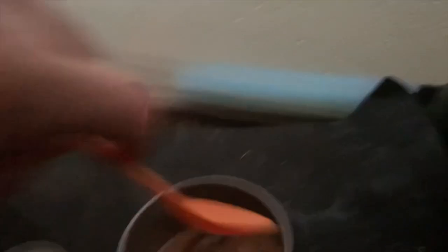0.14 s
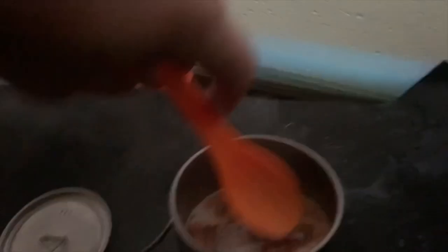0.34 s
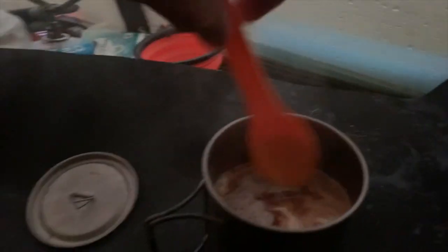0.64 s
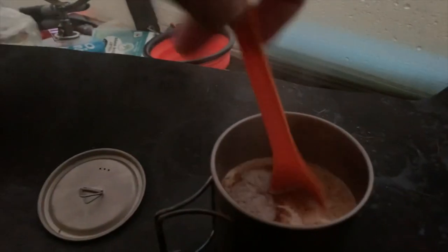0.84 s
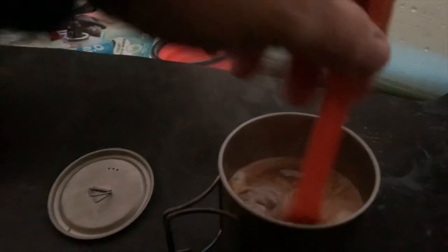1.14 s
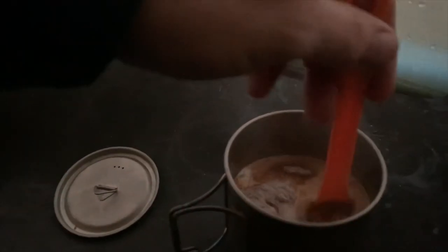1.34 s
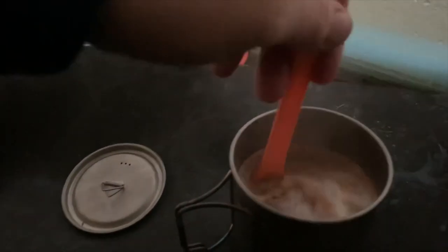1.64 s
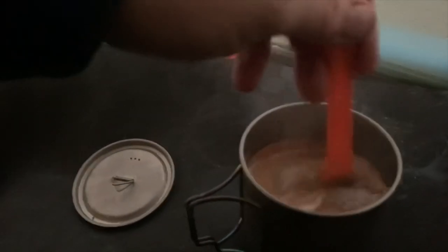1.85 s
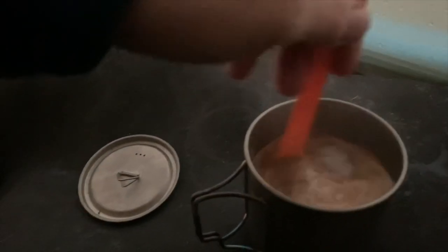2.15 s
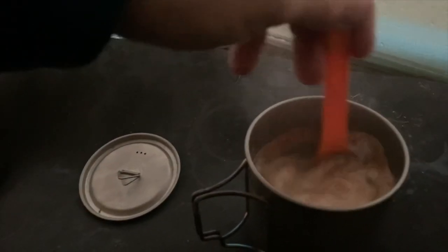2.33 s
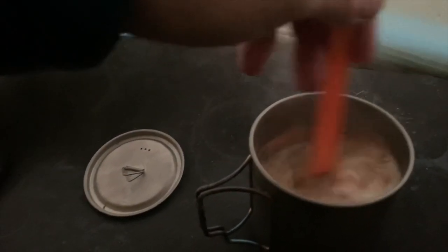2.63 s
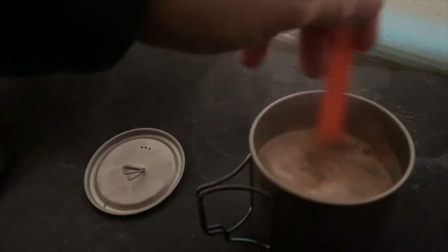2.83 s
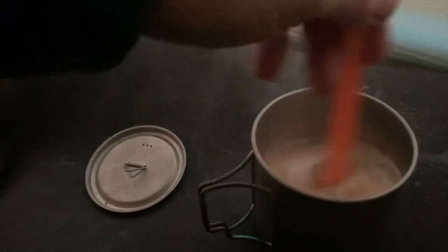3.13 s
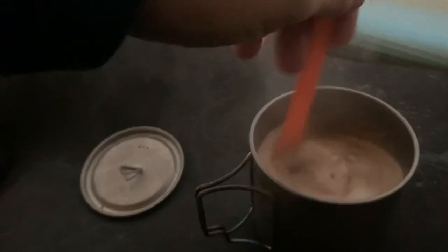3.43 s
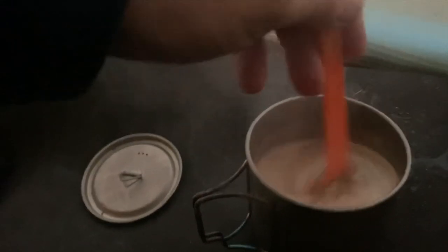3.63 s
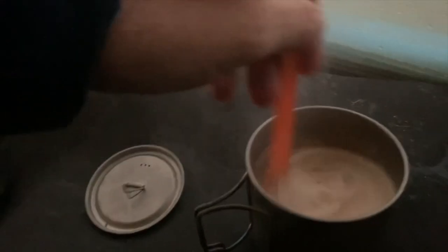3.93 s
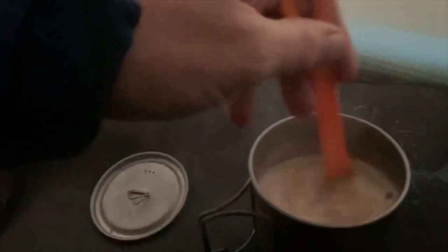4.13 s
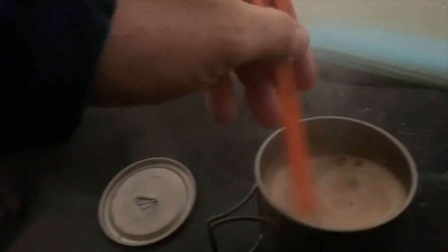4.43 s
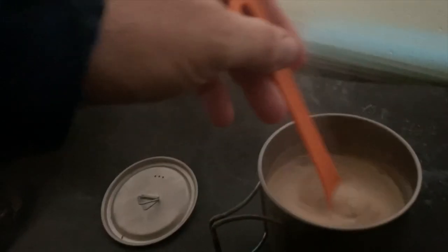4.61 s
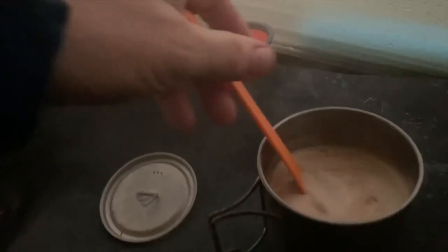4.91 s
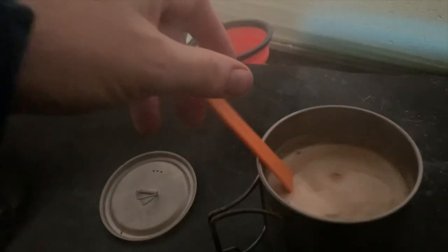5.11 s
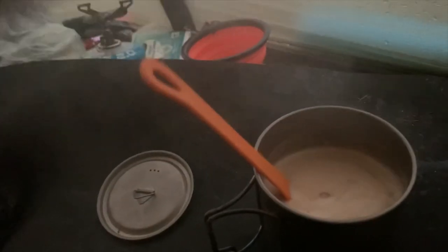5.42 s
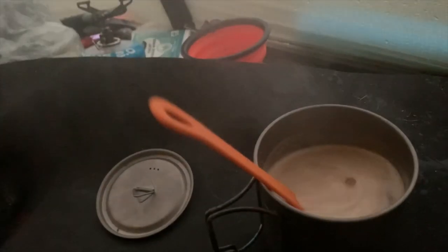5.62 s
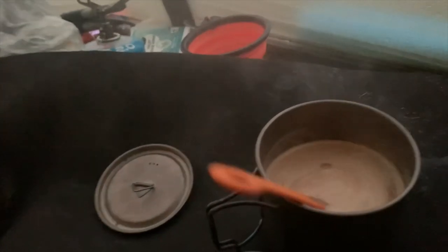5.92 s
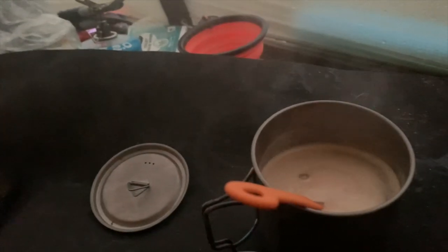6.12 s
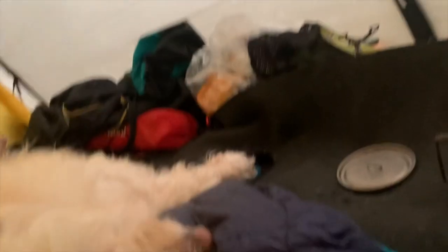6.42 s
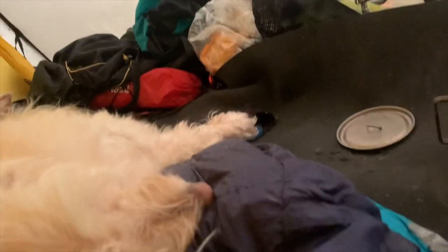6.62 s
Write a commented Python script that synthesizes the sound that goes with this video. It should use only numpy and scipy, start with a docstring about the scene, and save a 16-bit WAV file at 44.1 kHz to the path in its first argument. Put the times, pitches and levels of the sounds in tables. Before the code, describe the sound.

Heavy rain falls on a tent for the whole seven seconds or so, heard from inside. It is a dense patter with a fine hiss above it, single fat drops snapping on the taut fabric overhead, and a soft low drumming with occasional dull thumps beneath. Close to the microphone, a plastic spoon stirs a drink in a small metal pot. A few sharp ticks and a tiny scrape come at about 0.5 seconds, followed by scattered ticks and small liquid plops. The stirring is busiest from about 2.8 to 4.3 seconds, with quick ticks, short damped taps on the pot wall, very brief scrapes and more plops. The last faint ticks come by 5.4 seconds. Around 5.8 seconds the patter grows heavier. At about 6.3 seconds the listening position jumps within the tent, and the rain is louder and fuller, with a cluster of strong drops until the end.

```python
"""Heavy rain on a tent, heard from inside on a microphone pair, over a small pot with a drink in it.
Drops snap on the taut fabric overhead, fine spray fizzes above them and the panels drum softly below.
A plastic spoon stirs: it ticks, taps and scrapes on the pot wall, and the drink plops.
Near the end the microphones jump to the bedding, where the rain on the fabric is louder and fuller."""
import sys
import numpy as np
from scipy import signal
from scipy.fft import rfft, irfft, next_fast_len
from scipy.io import wavfile
from scipy.ndimage import uniform_filter1d

SR = 44100
rng = np.random.default_rng(int(sys.argv[2]) if len(sys.argv) > 2 else 0)


def wav_out(sig):
    """Save sig, one row per channel (or a flat mono array), as 16-bit PCM at SR to the path in sys.argv[1]."""
    wavfile.write(sys.argv[1], SR, np.round(np.clip(np.atleast_2d(sig).T, -1, 1) * 32767).astype(np.int16))


N = 298116
TIME = np.arange(N) / SR


def rainfall(flurry_db=1.0, flurry_s=.04, spray_swing=1.87):
    """Middling drops pat on the roof, tiny ones tick above. Gives steady pats, flurried patter and spray."""
    pats = shower(per_s=520, spread_db=3.15, largest=2.27, span_hz=(640, 4290),
                  burst_s=.002, ring_db=-6, q=13.3)
    specks = shower(per_s=900, spread_db=3.5, largest=3.1, span_hz=(2587, 12570),
                    burst_s=.0022, ring_db=-1, q=22)
    knots = np.arange(0, N / SR + 1, flurry_s)
    flurry = gain_of(flurry_db * np.interp(TIME, knots, rng.standard_normal(1000)[:len(knots)]))
    patter = flurry * far_wash(pats, db=-9)
    spray = flurry ** spray_swing * far_wash(unit_rms(specks + pats), db=-7)
    return pats, patter, spray


def shower(per_s, spread_db, largest, span_hz, burst_s, ring_db, q, count=160):
    """Drops of random size land at random times on spots of differing tautness, each with its own pitch."""
    lands = rng.random(N) < per_s / SR
    strength = gain_of(spread_db * np.minimum(rng.exponential(1, N), largest))
    spot_hit = rng.integers(0, count, N)
    spots = [impact(hz, ring_db, q, burst_s * 2 ** rng.uniform(-1, 1), tail_db=-11)
             for hz in np.geomspace(*span_hz, count)]
    out = np.zeros((2, N))
    for i in np.flatnonzero(lands):
        add(out, i / SR, strength[i] * spots[spot_hit[i]])
    return unit_rms(out)


def impact(hz, ring_db, q, burst_s, tail_db=-13, tail_s=.008, size=2200):
    """One hit of unit energy: a crack, a short burst and its scatter, ringing at the pitch of the spot."""
    t = np.arange(size) / SR
    crack = np.exp(-t / .0006)
    scatter = gain_of(tail_db) * np.exp(-t / tail_s)
    burst = rng.standard_normal((2, size)) * (crack + np.exp(-t / burst_s) + scatter)
    ring = signal.lfilter(*signal.iirpeak(hz, q, SR), burst)
    return unit_rms(unit_rms(burst) + gain_of(ring_db) * unit_rms(ring)) / np.sqrt(2 * size)


# Strength of the rain above the pot: (time [s], relative patter level [dB], relative spray level [dB])
RAIN_OVER_POT = [(0.0, -39.5, -42.5), (0.1, -39.5, -42), (0.2, -46, -47), (0.4, -43.5, -42.5),
                 (0.64, -45.5, -44.5), (1.0, -41.5, -42.5), (1.4, -40.5, -39.5), (1.47, -49, -45.5),
                 (1.6, -39.5, -37.5), (1.9, -42.5, -44), (2.5, -42.5, -42.5), (2.97, -43.5, -45.5),
                 (3.5, -44, -44), (3.75, -44, -47), (4.05, -40.5, -42), (4.74, -41, -41.5),
                 (4.87, -47, -47.5), (5.06, -38.5, -39.5), (5.58, -42.5, -43), (5.84, -33.5, -39),
                 (6.02, -36.5, -43.5), (6.14, -33, -41.5), (6.3, -40.5, -46.5)]
# The fabric heard from the pot, and the spray from either place: (frequency [Hz], relative level [dB])
FABRIC_FROM_POT = [(100, -14), (250, 5), (400, -4), (550, -9), (830, 2.5), (1050, 0), (1400, 3.5),
                   (2200, 3.5), (4000, -0.5), (6000, -18), (10000, -26.5), (16000, -7.5)]
SPRAY_COLOUR = [(500, 5.5), (2000, -5.5), (3700, -0.5), (5300, 0.5), (7000, 1), (9000, -3), (11000, -1),
                (13000, -5.5), (16000, -6.5)]
def rain_over_pot(patter, spray):
    """Rain on the roof with the microphones at the pot; the patter grows heavier near the end."""
    fabric = colour(patter * follow(RAIN_OVER_POT, column=1), FABRIC_FROM_POT)
    fizz = colour(spray * follow(RAIN_OVER_POT, column=2), SPRAY_COLOUR)
    return gain_of(-4) * fabric + gain_of(1.55) * fizz


# The fabric heard from the bedding: (frequency [Hz], relative level [dB])
FABRIC_FROM_BED = [(100, 5), (250, 0.5), (550, 1), (850, -4), (1400, -5), (2200, -1), (4000, -10),
                   (6500, -14), (10000, -27), (16000, -27)]
def rain_over_bed(pats, spray):
    """Rain on the roof with the microphones at the bedding: steady, with more far drops in it."""
    fabric = colour(far_wash(pats, db=-2.5), FABRIC_FROM_BED)
    return gain_of(-34) * fabric + gain_of(-38) * colour(spray, SPRAY_COLOUR)


# Single loud drops overhead: (time [s], relative level [dB], snap offset [dB], pitch [Hz])
FAT_DROPS = [(0.044, -25, -4, 1510), (0.068, -32, 2.5, 1110), (0.116, -28, -4, 2300),
             (0.532, -29.5, -11, 1260), (0.79, -30, 4, 1640), (0.8715, -35.5, 4, 920),
             (0.927, -27, -2, 2200), (1.151, -32, 6, 1500), (1.695, -26.5, -15, 1160),
             (1.709, -28, 5, 1400), (1.7981, -25.5, -3, 1130), (2.1644, -27.5, 1, 840),
             (2.384, -32, 6, 855), (2.585, -31.5, 2, 2000), (2.7654, -32, 7, 890), (2.8926, -29.5, -8, 860),
             (3.042, -34, 1, 1540), (3.076, -33, -9, 800), (3.174, -33, -13, 900), (3.192, -31.5, -12, 970),
             (3.322, -27, -4, 1410), (4.039, -28.5, 0, 825), (4.13, -26.5, 2, 1250), (4.2279, -32, 6, 1200),
             (4.277, -32, -14, 1240), (4.5415, -31, -8, 820), (4.623, -25.5, -1, 1710),
             (4.8402, -25.5, -9, 1330), (5.3725, -26, -3, 1240), (5.474, -27, -8, 1700),
             (5.7915, -31, -12, 2840), (5.8333, -28, 1.5, 1210), (5.856, -23.5, -8, 2200),
             (5.936, -24, -2.5, 2450), (6.1038, -31, -15, 1500), (6.1721, -27, -14, 2220),
             (6.337, -31, -1.5, 790), (6.3621, -20.5, -9, 990), (6.434, -28, -12, 1060),
             (6.451, -21.5, -6, 920), (6.488, -24, -24, 1350), (6.518, -30, -18, 1810),
             (6.5942, -17.5, -7.5, 1270), (6.621, -24, -14, 750), (6.6573, -18.5, -15, 1190),
             (6.6724, -24, -4.5, 1500), (6.697, -29, -14, 1590), (6.724, -26.5, -6, 1030)]
# Their slap on the fabric: (frequency [Hz], relative level [dB])
SLAP_COLOUR = [(100, -27), (350, 4), (800, 3), (1400, 0.5), (2200, -2), (4000, 0), (8000, -35),
               (16000, -30)]
def fat_drops(slap_db, dent_db, snap_db, thud_db, echo_s=.003, echo_db=-11):
    """Each fat drop dents the fabric, slaps, and adds a bright snap of water and a brief low thud."""
    slaps, snaps, dents = np.zeros((3, 2, N))
    t = np.arange(SR // 20) / SR
    for s, db, snap_offset_db, hz in FAT_DROPS:
        slap = impact(hz, ring_db=-6, q=3, burst_s=.0018)
        snap = impact(rng.uniform(4000, 11000), ring_db=-7, q=4, burst_s=.0022)
        thud_hz = 390 * 2 ** rng.uniform(-.3, .3)
        thud = np.sin(2 * np.pi * thud_hz * t) * np.exp(-t / .005)
        add(slaps, s + .001, gain_of(db + slap_db) * slap)  # just after the fabric first gives
        add(snaps, s, gain_of(db + snap_offset_db + snap_db) * snap)
        add(dents, s, gain_of(db + dent_db) * dent(hz))
        add(dents, s + echo_s, gain_of(db + dent_db + echo_db) * dent(hz))  # off the nearest tent wall
        add(dents, s, gain_of(db + thud_db) * thud)
    return colour(slaps, SLAP_COLOUR) + dents + colour(snaps, SPRAY_COLOUR)


def dent(hz, rise_cycles=.48, glide=.98):
    """The fabric dents and springs back in a short falling chirp, since its fast ripples arrive first."""
    t = np.arange(SR // 50) / SR
    age = t * hz / rise_cycles
    pitch = hz * (1 + glide * np.exp(-age)) * np.exp(-age / 10)
    return age * np.exp(1 - age) * np.sin(2 * np.pi * np.cumsum(pitch) / SR)


# Sharp ticks, mostly the spoon on the pot: (time [s], relative level [dB], pitch [Hz])
SPOON_TICKS = [(0.412, -32.5, 6480), (0.477, -29.5, 7100), (0.521, -33, 6000), (0.5324, -25.5, 6300),
               (0.859, -35, 11000), (1.1022, -29.5, 10400), (1.51, -33, 7200), (2.038, -30, 7600),
               (2.807, -27.5, 10200), (2.8945, -23.5, 7000), (3.042, -28.5, 8140), (3.0756, -25.5, 7500),
               (3.164, -29, 6000), (3.1732, -30.5, 5600), (3.19, -33, 6840), (3.2158, -26, 10500),
               (3.897, -32, 5400), (3.9535, -30, 6500), (4.503, -29, 7040), (5.113, -31, 11500),
               (5.37, -34, 11000)]
# Their colour at the pot: (frequency [Hz], relative level [dB])
TICK_COLOUR = [(200, -33), (800, 7.5), (2500, 6.5), (5000, 0), (11000, -0.5), (16000, -4)]
def spoon_ticks(gain_db=23):
    """Hard, bright contacts that die at once."""
    out = np.zeros((2, N))
    for s, db, hz in SPOON_TICKS:
        contact = impact(hz, ring_db=-7, q=6, burst_s=.0028, tail_db=-14, tail_s=.009)
        add(out, s, gain_of(db + gain_db) * contact)
    return colour(out, TICK_COLOUR)


# Taps on the pot wall: (time [s], relative level [dB], pitch the spot favours [Hz], spread [octaves])
SPOON_TAPS = [(0.0325, -26.5, 1750, 0.22), (2.7653, -24, 2630, 0.34), (2.8936, -25, 1810, 0.34),
              (2.8945, -25, 780, 0.4), (3.077, -32, 900, 1.2), (3.164, -33, 1600, 0.48),
              (3.3211, -29, 1400, 0.95), (3.4895, -28, 1950, 0.29), (3.668, -25.5, 1270, 0.3),
              (4.2769, -26, 1400, 0.37)]
# Modes of the filled pot: (frequency [Hz], relative level [dB], time to fall 60 dB [s])
FILLED_POT_MODES = [(795, -5, 0.044), (1150, -2, 0.018), (1360, -2, 0.025), (1890, -1, 0.024),
                    (2360, -2, 0.028), (3180, -4, 0.035)]
def spoon_taps():
    """The spoon taps the filled pot; where it strikes decides which of the damped modes speak."""
    out, t = np.zeros((2, N)), np.arange(SR // 8) / SR
    hz, mode_db, t60 = np.transpose(FILLED_POT_MODES)[:, :, None]
    for s, db, spot_hz, octaves in SPOON_TAPS:
        share = np.exp(-(np.log2(hz / spot_hz) / octaves) ** 2)
        modes = share * gain_of(mode_db - 60 * t / t60) * np.sin(2 * np.pi * hz * t)
        add(out, s, gain_of(db) * modes.sum(0))
    return out


# Short scrapes along the pot wall: (time [s], length [s], level [dB])
SPOON_SCRAPES = [(0.478, 0.018, -37.5), (3.156, 0.028, -35), (3.49, 0.012, -34)]
# Their colour at the pot: (frequency [Hz], relative level [dB])
SCRAPE_COLOUR = [(300, -25), (900, 4), (1800, 1), (3000, -5), (6000, -4), (11000, -5), (16000, -28)]
def spoon_scrapes(slips_per_s=700, grit_db=-9):
    """The spoon drags in a quick run of tiny slips, with grit between them."""
    out = np.zeros((2, N))
    for s, length, db in SPOON_SCRAPES:
        size = round(length * SR)
        slips = (rng.random(size) < slips_per_s / SR) * rng.choice([-1., 1.], (2, size))
        grit = gain_of(grit_db) * rng.standard_normal((2, size))
        drag = unit_rms(unit_rms(slips) + grit)
        add(out, s, gain_of(db) * signal.get_window(("tukey", .5), size) * drag)
    return colour(out, SCRAPE_COLOUR)


# Plops, centred between the microphones: (time [s], level [dB], pitch [Hz], time to fall 60 dB [s])
LIQUID_PLOPS = [(0.0445, -26, 870, 0.014), (0.0705, -29, 744, 0.023), (1.3274, -20, 1210, 0.01),
                (1.3323, -25, 1090, 0.017), (1.622, -31, 404, 0.098), (2.0, -31.5, 353, 0.068),
                (3.194, -30, 570, 0.018), (3.205, -27.5, 322, 0.042), (3.321, -25, 540, 0.035),
                (3.671, -23.5, 380, 0.062), (4.116, -29, 380, 0.03), (4.277, -14.5, 533, 0.008)]
def plops():
    """Drips and the stirred drink ring briefly, falling in pitch."""
    return sagging_rings(LIQUID_PLOPS, sag=.21)


# Thumps, centred between the microphones: (time [s], level [dB], pitch [Hz], time to fall 60 dB [s])
LOW_THUMPS = [(0.49, -30, 122, 0.11), (1.25, -19, 106, 0.13), (1.615, -20, 73.5, 0.12),
              (1.79, -23, 95, 0.08), (2.335, -24, 87, 0.075), (3.32, -22.5, 124, 0.08),
              (3.58, -20.5, 93, 0.17), (4.277, -18, 127, 0.053), (4.94, -28, 78, 0.09),
              (5.835, -16, 73, 0.055), (6.172, -17.5, 76, 0.091)]
def thumps():
    """Dull, low notes under the rain, nearly steady in pitch."""
    return sagging_rings(LOW_THUMPS, sag=.032)


# Drumming of the tent all around: (time [s], relative wide-panel level [dB], small-panel level [dB])
PANEL_LEVELS = [(0.0, -50, -57), (0.48, -36, -38), (0.76, -42, -46.5), (1.32, -36, -40.5),
                (1.76, -33, -38.5), (1.92, -38.5, -42.5), (2.56, -40, -40), (3.04, -35, -39),
                (3.16, -41.5, -46.5), (3.32, -38, -40.5), (4.08, -44.5, -49), (4.28, -40.5, -43.0),
                (4.88, -34.5, -43), (5.04, -41, -38), (5.4, -35.5, -42.5), (5.52, -41.5, -44.5),
                (6.28, -34.5, -38), (6.76, -38, -53)]
# How the wide and the small panels answer a push: (frequency [Hz], relative level [dB])
WIDE_PANEL_COLOUR = [(15, -6), (30, -32), (45, -0.5), (80, -0.5), (115, -4.5), (160, -12.5), (300, -33),
                     (1000, -75.5)]
SMALL_PANEL_COLOUR = [(50, -24), (110, -2), (150, 0.5), (200, -2.5), (270, -13), (450, -22.5), (1200, -65)]
def panel_drumming(spectrum, level, per_s, side_db):
    """Drops push whole panels; the pushes merge into long waves, nearly alike at both microphones."""
    pushes = (rng.random(N) < per_s / SR) * rng.standard_normal((2, N))
    mid, side = colour(pushes, spectrum)
    rumble = mid + gain_of(side_db) * np.array([side, -side])
    running_rms = np.sqrt(uniform_filter1d(mid ** 2, size=6000) + 1e-9)
    return level * rumble / running_rms


def far_wash(near, db):
    """Countless far drops blur into a smooth hiss under the near ones."""
    return unit_rms(near + gain_of(db) * rng.standard_normal((2, N)))


# The pair in each place: (frequency [Hz], likeness [0-1], left phase lead [rad], left over right [dB])
MICS_AT_POT = [(180, 0.99, -0.0, -0.2), (380, 0.57, -0.9, -2.3), (550, 0.22, -1.0, -7.1),
               (780, 0.75, -0.4, -4.3), (1020, 0.38, -1.7, -2.0), (1650, 0.35, 0.0, -0.7),
               (2400, 0.49, 1.6, -0.1), (3300, 0.59, 1.0, -0.0), (4100, 0.72, 2.2, 0.3),
               (4700, 0.96, 3.1, 0.2), (5500, 0.78, 4.5, 0.1), (6600, 0.94, 6.1, 0.1),
               (9000, 0.93, 9.4, 0.0), (11200, 0.9, 12.6, -0.0), (13300, 0.92, 15.7, 0.1),
               (15000, 0.8, 18.8, 0.0)]
MICS_AT_BED = [(100, 0.97, 0.3, 1.8), (350, 0.29, -1.3, 7.8), (800, 0.62, -1.4, -1.1),
               (1700, 0.6, 0.9, 0.7), (3000, 0.2, -0.2, 0.2), (5000, 0.23, -0.3, 1.2),
               (7000, 0.39, 0.5, 0.6), (9700, 0.71, 3.1, -0.0), (13000, 0.8, 6.3, -0.1),
               (15800, 0.54, 9.4, 0.1)]
def microphone_pair(x, placement):
    """The two microphones hear partly the same sound, shifted in phase and level."""
    size = next_fast_len(N + 2048)
    hz, *columns = np.transpose(placement)
    likeness, phase, balance_db = (np.interp(np.fft.rfftfreq(size, 1 / SR), hz, c) for c in columns)
    left, other = rfft(x, size)
    right = (likeness * left + np.sqrt(1 - likeness ** 2) * other) * np.exp(-1j * phase)
    lean = gain_of(balance_db / 2)
    return irfft(np.array([left * lean, right / lean]), size)[:, :N]


def sagging_rings(rows, sag, sag_s=.013):
    """One damped mode a row; it swells within a cycle, and its pitch sags by a share as it dies."""
    out, t = np.zeros((2, N)), np.arange(SR // 5) / SR
    for s, db, hz, t60 in rows:
        pitch = hz * (1 - sag * (1 - np.exp(-t / sag_s)))
        cycles = np.cumsum(pitch) / SR
        envelope = np.minimum(2 * cycles, 1) * gain_of(db - 60 * t / t60)
        add(out, s, envelope * np.sin(2 * np.pi * cycles))
    return out


def colour(x, spectrum, size=4096):
    """Causal filter of unit energy with the given spectrum."""
    hz, db = np.transpose(spectrum)
    log_hz = np.log(abs(np.fft.fftfreq(size, 1 / SR)) + 1)
    log_gain = np.log(gain_of(np.interp(log_hz, np.log(hz), db)))
    minimum_phase = np.exp(np.conj(signal.hilbert(log_gain)))
    taps = np.fft.ifft(minimum_phase).real[:size // 2]
    return signal.oaconvolve(x, taps[None] / np.linalg.norm(taps), axes=1)[:, :x.shape[1]]


def gain_of(db):
    """Decibels to amplitude."""
    return 10 ** (np.asarray(db) / 20)


def unit_rms(x):
    """Scales to an rms of 1."""
    return x / np.sqrt(np.mean(x ** 2) + 1e-20)


def follow(rows, column):
    """Gain at every sample from one dB column of a curve."""
    columns = np.transpose(rows)
    return gain_of(np.interp(TIME, columns[0], columns[column]))


def add(mix, s, sound):
    """Mixes a sound in at s seconds."""
    part = mix[:, max(round(s * SR), 0):][:, :sound.shape[-1]]
    part += sound[..., :part.shape[1]]


def scene(move_s=6.333):
    """Inside the tent: the microphones stand at the pot, then from move_s at the bedding."""
    pats, patter, spray = rainfall()
    at_pot = rain_over_pot(patter, spray)
    at_pot += fat_drops(slap_db=16.5, dent_db=-1.5, snap_db=18.5, thud_db=-16.5)
    at_bed = rain_over_bed(pats, spray)
    spoon = spoon_ticks() + spoon_scrapes()
    at_bed += fat_drops(slap_db=14, dent_db=5.5, snap_db=21, thud_db=-5)
    placed = np.where(TIME < move_s, microphone_pair(at_pot + spoon, MICS_AT_POT),
                      microphone_pair(at_bed, MICS_AT_BED))
    wide_level = gain_of(1) * follow(PANEL_LEVELS, column=1)
    small_level = gain_of(-.3) * follow(PANEL_LEVELS, column=2)
    wide = panel_drumming(WIDE_PANEL_COLOUR, wide_level, per_s=200, side_db=-26.5)
    small = panel_drumming(SMALL_PANEL_COLOUR, small_level, per_s=500, side_db=-24.5)
    return placed + spoon_taps() + plops() + thumps() + wide + small


def record(dry, edge_hz=15900):
    """The band limit of the recorder."""
    lowpass = signal.firwin(511, edge_hz, window=("kaiser", 9), fs=SR)
    return signal.oaconvolve(dry, lowpass[None], "same")


dry = scene()
out = record(dry)
wav_out(out)
```